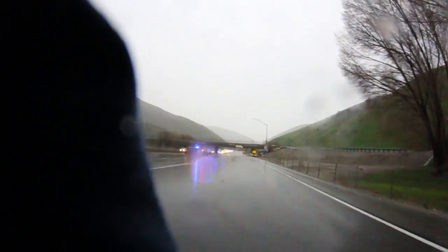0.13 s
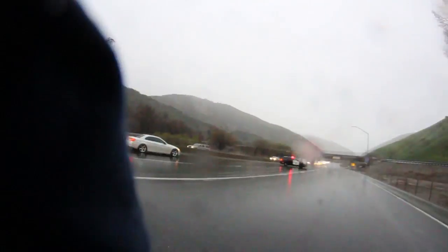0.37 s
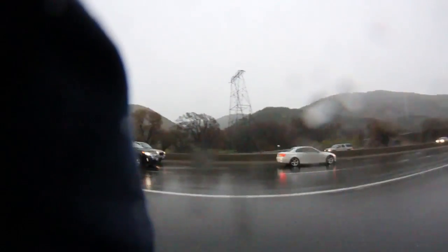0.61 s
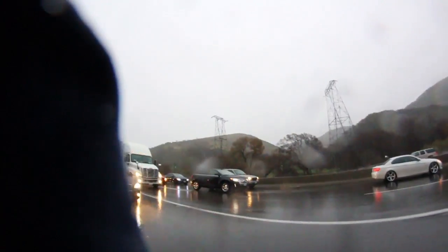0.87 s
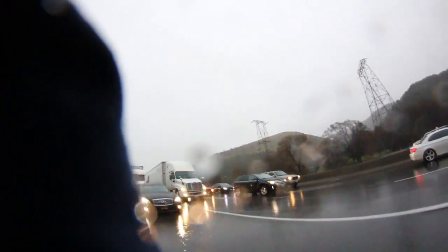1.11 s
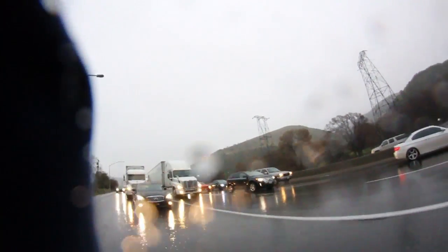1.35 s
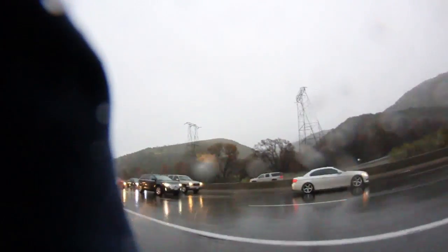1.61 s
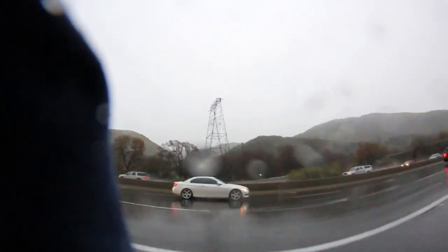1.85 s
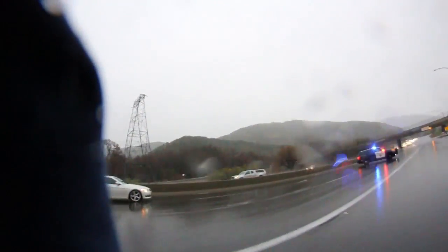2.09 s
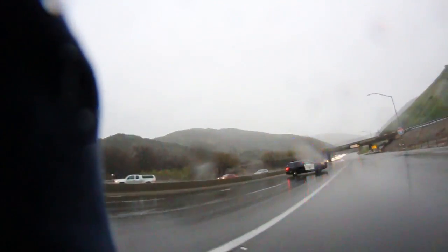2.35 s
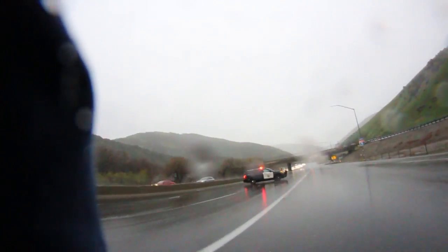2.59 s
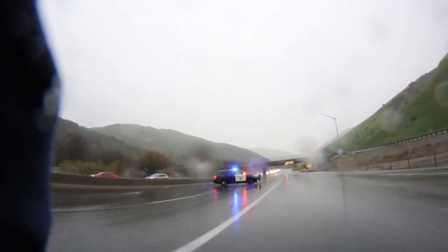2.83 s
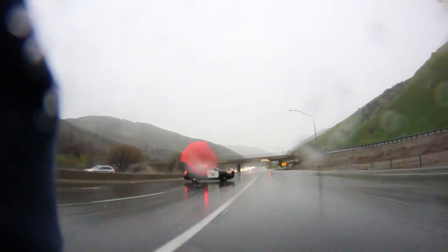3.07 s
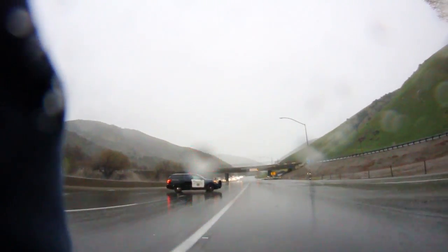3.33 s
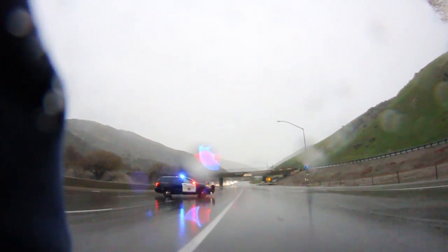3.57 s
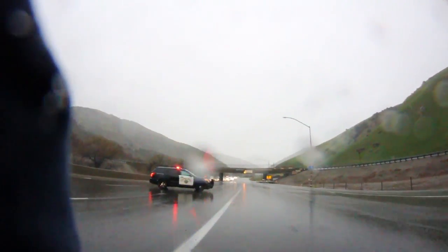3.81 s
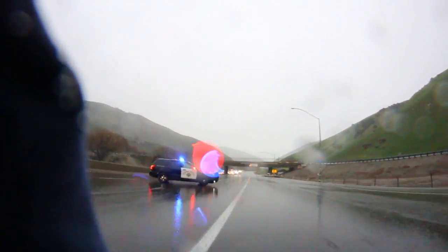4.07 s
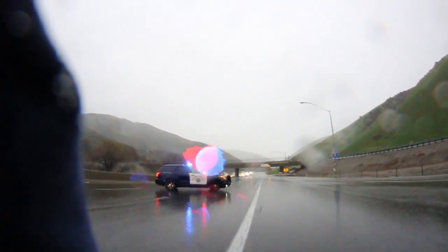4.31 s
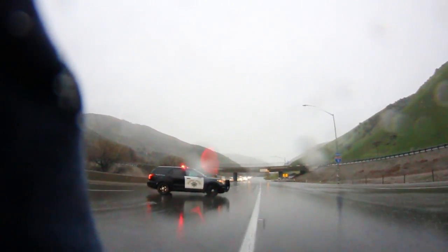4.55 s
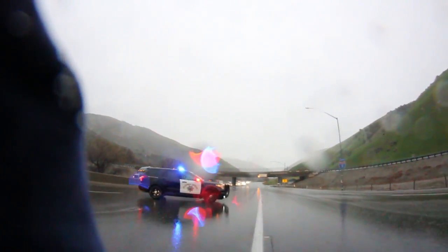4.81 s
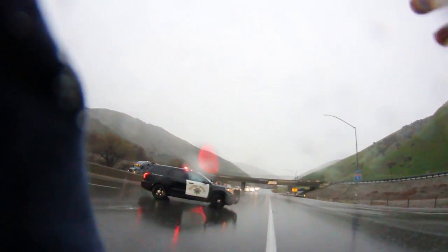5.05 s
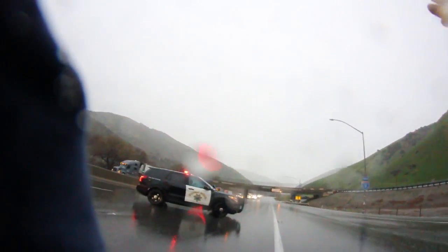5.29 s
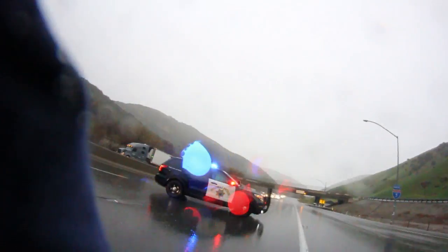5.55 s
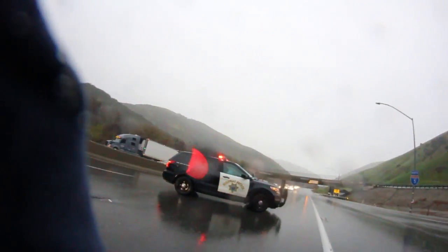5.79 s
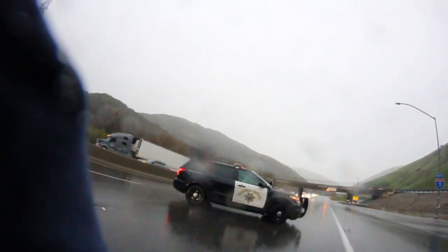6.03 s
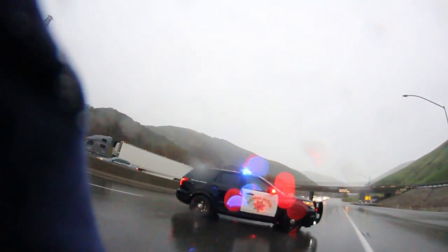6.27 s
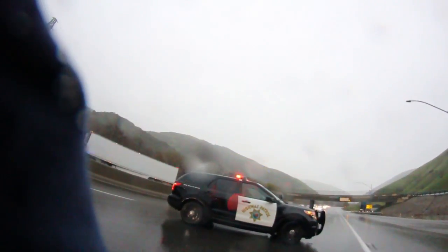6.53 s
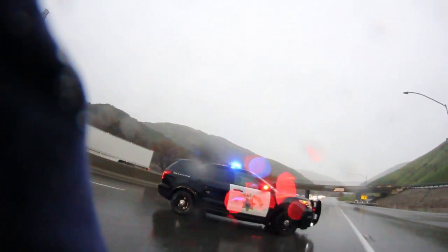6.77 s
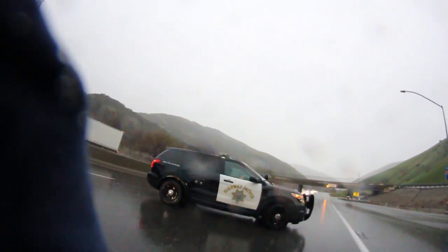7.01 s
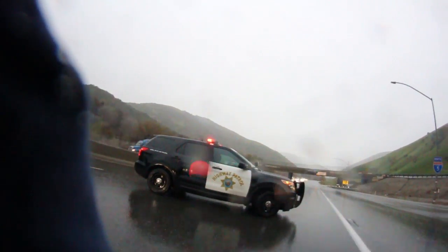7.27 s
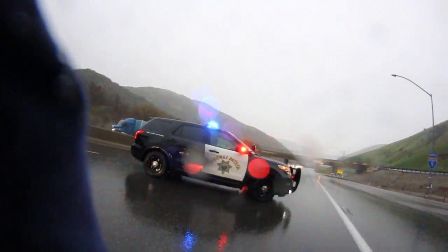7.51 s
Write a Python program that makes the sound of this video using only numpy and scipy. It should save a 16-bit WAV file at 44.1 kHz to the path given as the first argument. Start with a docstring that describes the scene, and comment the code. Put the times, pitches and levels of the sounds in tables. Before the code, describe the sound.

Constant boxy wheel rumble and irregular deck knocks dominate, so loud that the close, encased microphone distorts and crackles. Thin spray and mist hiss underneath. The roll gradually weakens and grows grainy, a puddle splash throws bright droplet ticks, and a few last bumps sound. Low traffic-like rumble and a surging rush take over with a brief sagging hum and tiny bright spits, outdoors in rain.

```python
"""Skateboard slowing on wet asphalt

Random pushes from the stones of a coarse road excite the resonances of the deck; bumps make them ring.
Band-shaped noise gives spray, mist and a low rumble; at the end a broad rush and a hum swell up.
Drops tick on the muffling case of the microphone that rides along.
The input overloads on the strongest swings; fine bright crackle joins the overload."""
import sys
import numpy as np
from scipy import signal
from scipy.fft import rfft, irfft, next_fast_len
from scipy.io import wavfile
from scipy.ndimage import uniform_filter1d, map_coordinates

SR = 44100
rng = np.random.default_rng(int(sys.argv[2]) if len(sys.argv) > 2 else 0)


def store_pcm(level_fs):
    """Save levels as 16-bit WAV."""
    pcm = np.round(np.clip(level_fs, -1, 1) * 32767).astype(np.int16)
    wavfile.write(sys.argv[1], SR, np.atleast_2d(pcm).T)


def gain_from_db(level_db):
    """Convert decibel levels to linear amplitude factors (20 dB per decade)."""
    decades = np.asarray(level_db, float) / 20
    return 10 ** decades


N = 336483

# Strength of the roll. Each row: time in seconds, low deck modes in dB, upper deck modes in dB.
ROLL_LEVEL = [(0, -13, -24), (.7, -16.5, -24), (1.3, -16, -23.5), (1.65, -15, -23.5), (1.93, -14, -24),
              (2.03, -14, -24.5), (2.3, -16, -23), (2.45, -13, -21), (3.25, -13.5, -22), (3.8, -17, -25),
              (3.92, -14, -22.5), (4.4, -14.5, -27), (4.92, -14, -26), (5.4, -18, -28), (6.0, -18, -27.5),
              (6.6, -21.5, -32.5), (7.16, -23.5, -31.5), (7.27, -31, -32.5), (7.63, -19, -33.5)]
# Stones under the wheels. Each row: time in seconds, stones per second.
STONE_RATE = [(0, 3000), (4, 2500), (5.2, 1200), (5.8, 510), (6.5, 820), (7.63, 860)]
# Deck modes while carving and while running straight, low and upper.
# Each row: centre in Hz, width in Hz, relative level in dB, signed weight (a factor).
LOW_CARVING = [(310, 69, -9.5, 0.96), (490, 116, -2.5, 0.8), (668, 119, -2, -1.034)]
LOW_STRAIGHT = [(317, 183, -7.5, 0.89), (447.6, 134, 0, -0.96), (674, 99, 0, 0.93)]
UPPER_CARVING = [(890, 326, 2, -0.65), (1237, 230, 8.5, 0.96), (1578, 650, -2, -1.25)]
UPPER_STRAIGHT = [(949, 242, 2.5, 0.77), (1077, 111, 1.5, -0.53), (1245, 380, -11.5, -1.3)]
# Carving against running straight. Each row: time in seconds, carving share of the power from 0 to 1.
CARVING_SHARE = [(0, 0.47), (.5, 0.5), (1.0, 0.95), (1.9, 0.92), (2.2, 0.49), (2.45, 0.12), (4.5, 0.18),
                 (5.3, 0.28), (7.63, 0.34)]
# Short rough stretches. Each row: centre in seconds, swell in dB, half width to 1/e of the swell in seconds.
ROUGH_PATCHES = [(.721, 3.5, .004), (1.038, 2, .004), (1.313, 2.5, .007), (1.36, 1.5, .004),
                 (1.891, 4, 0.0067), (1.947, 4, 0.0044), (2.85, 0, 0.0048), (2.936, 3, 0.0051),
                 (2.961, 2.5, 0.0045), (3.039, 4.5, 0.0081), (3.1, 3, .004), (3.118, 4.5, 0.0076),
                 (3.25, 4.5, 0.0047), (5.63, 3.5, 0.024), (5.7, 4, 0.018), (5.859, 8.5, 0.022),
                 (6.078, 6.5, 0.02), (6.261, 9.5, 0.0053), (6.32, 4.5, 0.013), (6.39, 3, 0.023),
                 (6.513, 8.5, 0.012), (6.79, 5.5, 0.061)]
# The deck mode that slides as the board leans. Each row: time in seconds, centre in Hz, level in dB.
SLIDING_MODE = [(0.3, 693, -39.5), (0.6, 710, -24), (0.85, 752, -19), (1.1, 800, -22), (1.45, 843, -20.5),
                (1.75, 803, -25), (1.9, 714, -14.5), (2.05, 700, -31), (2.4, 718, -25), (2.65, 770, -23),
                (3.2, 767, -19.5), (3.6, 708, -25.5), (4.2, 733, -29.5), (4.6, 724, -42)]
# Bumps in the road. Each row: time of the peak in seconds, peak in dB.
BUMPS = [(0.085, -9), (0.173, -1.5), (0.321, -5), (0.35, -2), (0.397, -5.5), (0.477, -6.5), (0.626, -4),
         (0.719, -1.5), (0.76, -0.5), (0.764, -1), (0.831, -7.5), (0.881, -3), (0.906, -2), (0.95, -9.5),
         (0.984, -5.5), (1.008, -2), (1.036, 1.5), (1.074, -4.5), (1.055, -6), (1.096, -3), (1.101, -6.5),
         (1.109, -5), (1.15, -3), (1.163, -5), (1.176, -7), (1.197, 0.5), (1.257, -10), (1.281, -1),
         (1.288, -4.5), (1.308, 0.5), (1.316, -5), (1.358, -2.5), (1.38, -4.5), (1.387, -7.5), (1.394, -6),
         (1.438, -7), (1.485, -5.5), (1.513, -7), (1.582, -9), (1.594, -5), (1.614, -4), (1.628, -3),
         (1.665, -3), (1.693, -4), (1.702, -6.5), (1.706, -10), (1.734, -3), (1.755, -4), (1.786, -4.5),
         (1.79, -4.5), (1.815, -8), (1.826, -1.5), (1.852, -3), (1.862, -7), (1.876, -5.5), (1.888, -9.5),
         (1.904, -3), (1.914, -7.5), (1.92, -3), (1.925, -4.5), (1.937, -8.5), (1.945, -3), (1.955, -4),
         (1.974, -3.5), (2.044, -3), (2.137, -6), (2.26, -6.5), (2.362, -7.5), (2.398, -4), (2.463, -2.5),
         (2.489, -2), (2.514, -3.5), (2.54, -6), (2.56, -2.5), (2.598, -2), (2.648, -8), (2.668, -2.5),
         (2.695, -8), (2.718, -8.5), (2.744, -4.5), (2.803, -6), (2.809, -4.5), (2.816, -7), (2.826, -8.5),
         (2.833, -6.5), (2.85, -12), (2.869, -10.5), (2.881, -5.5), (2.899, -3.5), (2.915, -3.5),
         (2.933, -8), (2.958, -6.5), (2.978, -5.5), (2.985, -3.5), (2.992, -4), (3.002, -6.5), (3.037, -9),
         (3.056, -9), (3.063, -4.5), (3.07, -5.5), (3.078, -6.5), (3.097, -6.5), (3.117, -4), (3.13, -3),
         (3.152, -6), (3.171, -4.5), (3.195, -4.5), (3.214, -2.5), (3.222, 0), (3.248, -4), (3.268, -8),
         (3.29, -7.5), (3.303, -7.5), (3.327, -5.5), (3.417, -7.5), (3.493, -2), (3.515, -4.5),
         (3.525, -6.5), (3.563, -1.5), (3.597, -4), (3.666, -5.5), (3.694, -5), (3.715, -11.5),
         (3.746, -4.5), (3.862, -3), (3.889, -6), (3.942, -3.5), (3.968, -8.5), (4.012, -11.5),
         (4.02, -6.5), (4.061, -8), (4.076, -13.5), (4.084, -6), (4.091, -7), (4.115, -3.5), (4.255, -8),
         (4.326, -2.5), (4.665, -2.5), (4.775, -5), (4.8, -18), (4.927, -8.5), (4.937, -9), (5.028, -1.5),
         (5.142, -9), (5.162, -4), (5.206, -6.5), (5.212, -11.5), (5.627, -7.5), (5.838, -21), (5.864, 1),
         (5.901, -6), (5.94, -5.5), (5.972, -17), (6.058, -4.5), (6.077, -8), (6.165, -9), (6.264, -9),
         (6.368, -15), (6.424, -10), (6.457, -22), (6.503, -21), (6.645, -8.5), (6.893, -5)]
# Colour of the scrape. Each row: frequency in Hz, relative density in dB per Hz.
SCRAPE_COLOUR = [(600, -120), (900, -41), (1150, -13), (1280, 5), (1420, -5), (1800, -43), (2600, -120)]
# Fine crackle of the overload. Each row: time in seconds, crackles per second.
CRACKLE_RATE = [(0, 15), (.7, 25), (1.0, 50), (1.9, 50), (2.1, 25), (2.45, 90), (2.9, 220), (3.25, 220),
                (3.55, 80), (3.8, 30), (4.1, 90), (4.4, 12), (5.3, 6), (6.1, 3), (6.4, 0.1), (7.63, 0.1)]
# Colour of the crackle. Each row: frequency in Hz, relative gain in dB.
CRACKLE_COLOUR = [(800, -59), (1800, -2.5), (2500, -1.5), (4000, -6.5), (7000, -14), (11000, -20.5),
                  (16000, -34)]
# Large drops on the case. Each row: start in seconds, starting level in dB, pitch in Hz.
DROPS = [(4.867, -48, 11100), (5.014, -44, 5900), (5.09, -40.5, 5650), (5.279, -53, 12500),
         (5.371, -50, 10500), (5.383, -47.5, 10000), (5.397, -45, 6060), (5.47, -45, 6530),
         (5.481, -44, 6700), (5.496, -46, 6200), (5.514, -48.5, 8500), (5.532, -42.5, 8000),
         (5.544, -42.5, 8600), (5.555, -45.5, 8100), (5.588, -45, 6500), (5.6, -44, 7600),
         (5.609, -46, 7600), (5.616, -39.5, 6200), (5.691, -49, 7200), (5.704, -43, 7000),
         (5.73, -47, 10700)]
# Fine droplets around the splash through a puddle. Each row: time in seconds, droplets per second.
DRIZZLE_RATE = [(4.6, 20), (5.3, 40), (5.47, 150), (5.53, 1200), (5.75, 800), (5.9, 300), (6.2, 20),
                (6.5, 0)]
# Water off the wheels. Each row: time in seconds, spray in dB, mist in dB.
WATER_LEVEL = [(0, -47.5, -55.5), (1.9, -49, -61), (2.3, -50, -59), (3, -49.5, -58.5), (3.4, -41, -57.5),
               (3.7, -46.5, -62), (4.2, -44, -59), (5.2, -43.5, -58.5), (5.46, -49.5, -63.5),
               (5.53, -45, -58), (5.75, -46, -55.5), (6.0, -49.5, -59), (6.4, -51.5, -59.5),
               (6.65, -43, -53), (6.85, -40, -50.5), (7.16, -46, -53.5), (7.25, -35.5, -55),
               (7.63, -37.5, -51)]
# Colours of spray and mist. Each row: frequency in Hz, relative density in dB per Hz.
SPRAY_COLOUR = [(1200, -30), (1600, -7), (1980, -13), (2150, -5), (2280, 1), (2450, -3), (2750, -10),
                (3500, -19), (4500, -30), (7000, -60)]
MIST_COLOUR = [(2500, -29.5), (4000, 0), (5500, -1.5), (6300, 1), (7500, -7), (9000, -8.5), (10500, -9),
               (13000, -20), (16000, -36.5)]
# Traffic and wind. Each row: time in seconds, rumble in dB.
RUMBLE_LEVEL = [(0, -37), (1.2, -30.5), (2.3, -36.5), (3.4, -27.5), (5.2, -30.5), (5.5, -23.5), (6.4, -28),
                (6.8, -19), (7.25, -28), (7.6, -18.5)]
# Colour of the rumble. Each row: frequency in Hz, relative density in dB per Hz.
RUMBLE_COLOUR = [(15, -68), (25, -26.5), (70, -20), (135, -6), (260, -4), (340, -9.5), (570, -120)]
# The late rush and its bright top. Each row: time in seconds, level in dB.
RUSH_LEVEL = [(4.8, -51.5), (5.5, -34), (6.4, -28.5), (6.87, -18.5), (7.15, -15), (7.25, -18.5),
              (7.5, -12.5), (7.63, -13.5)]
WASH_LEVEL = [(6.3, -69.5), (6.55, -56), (6.72, -48.5), (6.85, -44), (7.0, -46.5), (7.13, -41.5),
              (7.19, -49), (7.24, -46.5), (7.4, -44.5), (7.63, -43)]
# Colours of the rush, its bright top and the spits. Each row: frequency in Hz, relative density in dB per Hz.
RUSH_COLOUR = [(18, -41.5), (40, 1), (110, 5), (230, -6.5), (370, -17.5), (600, -3.5), (800, -12.5),
               (1100, -13), (2000, -17.5), (3200, -25), (5000, -38.5), (7500, -46.5), (9000, -58.5),
               (12000, -65.5), (16000, -68.5)]
WASH_COLOUR = [(1200, -39), (2000, -7), (3000, 0.8), (4500, 2), (6000, -2), (7600, -6.5), (8400, -18),
               (10000, -21), (13000, -24.5), (16000, -44)]
SPIT_COLOUR = [(2500, -16), (6000, 1.5), (8500, -2), (11000, 0), (12500, -6), (14500, -11.5), (16000, -18)]
# The hum, which swells and then fades as it sags. Each row: time in seconds, pitch in Hz, level in dB.
HUM = [(6.74, 602, -45), (6.79, 600, -25), (6.85, 599, -22), (6.9, 598, -18.5), (7.0, 597, -18),
       (7.17, 595, -16), (7.23, 595, -22), (7.32, 592, -24), (7.39, 582, -25), (7.45, 580, -31),
       (7.63, 578, -31)]
# Bright spits. Each row: start in seconds, starting level in dB, time to fall by 60 dB in seconds.
SPITS = [(7.4966, -37, 0.023), (7.5125, -31.5, 0.02), (7.5367, -44.5, 0.02)]
# Where the input overloads. Each row: time in seconds, ceiling of upward swings in dB.
CEILING = [(0, -5), (.4, -6), (.75, -6), (.9, -6), (1.5, -5), (2.3, -5.5), (2.8, -6.5), (3.25, -7.5),
           (3.55, -6), (4.3, -6.5), (4.55, -3.5), (5.2, -5), (5.5, 0), (5.8, 2.5), (7.63, 2)]


def unit(x):
    """Normalisation: scale to rms 1."""
    return x / np.sqrt(np.mean(x ** 2) + 1e-20)


def curves(rows):
    """Linear interpolation: one value per sample for each column after the time."""
    s, *cols = np.transpose(rows)
    return [np.interp(np.arange(N) / SR, s, c) for c in cols]


def wobble(rate):
    """Slow random modulation: a smooth curve through random knots, rate of them per second."""
    knots = rng.standard_normal(int(N * rate / SR) + 4)
    return map_coordinates(knots, [np.arange(N) * rate / SR])


def filtered(x, response):
    """Linear filtering: the spectrum of x times a complex response of frequency."""
    m = next_fast_len(N + 8192)
    return irfft(rfft(x, m) * response(np.fft.rfftfreq(m, 1 / SR)), m)[:N]


def resonances(modes, soft_hz):
    """Modal superposition: damped modes add with their signs; soft wheels and case each dull the treble."""
    def response(f):
        total = 0
        for centre, width, db, sign in modes:
            total = total + sign * gain_from_db(db) * 1j * f * width / (centre ** 2 - f ** 2 + 1j * f * width)
        return total / (1 + 1j * f / soft_hz) ** 2
    return response


def hiss(colour, patchy_db):
    """Turbulent noise: random gains over time and frequency, then a spectral colour, at rms 1."""
    z = signal.stft(rng.standard_normal(N + 512), nperseg=512)[2]
    field = uniform_filter1d(rng.standard_normal(z.shape), 6, 0)
    field = uniform_filter1d(field, 12, 1)
    noise = signal.istft(z * gain_from_db(patchy_db * unit(field)), nperseg=512)[1][:N]
    hz, db = np.transpose(colour)
    return unit(filtered(noise, lambda f: gain_from_db(np.interp(np.log(f + 1), np.log(hz + 1), db))))


def road(scatter_db, smooth):
    """Random excitation: stones push by scattered amounts, over the fine texture of the road."""
    chance = curves(STONE_RATE)[0] / SR
    hit = rng.random(N) < chance
    size = np.minimum(rng.exponential(size=N), 3.5)
    side = np.sign(rng.standard_normal(N))
    # dividing by the root of the rate keeps the power even as stones thin out
    stones = unit(hit * side * gain_from_db(scatter_db * size) / np.sqrt(chance))
    return stones + smooth * rng.standard_normal(N)


def rolling():
    """Forced vibration: the road shakes deck modes that shift with the rider's weight; rough patches swell all."""
    bump_swell_db, bump_swell_s = 0.5, 0.0036  # brief swell after each bump; its lag and 1/e half width
    t = np.arange(N) / SR
    carve = curves(CARVING_SHARE)[0]
    patches = gain_from_db(0.27 * wobble(30))
    swell_db = sum(db * np.exp(-((t - s) / width) ** 2) for s, db, width in ROUGH_PATCHES)
    bumped = np.bincount([round((s + bump_swell_s) * SR) for s, _ in BUMPS], minlength=N)
    bell = np.exp(-((t[:SR // 20] - 1 / 40) / bump_swell_s) ** 2)
    swell_db += bump_swell_db * signal.fftconvolve(bumped, bell, 'same')
    low_gain, upper_gain = gain_from_db(np.array(curves(ROLL_LEVEL)) + swell_db)
    out = np.zeros(N)
    stances = (carve, LOW_CARVING, UPPER_CARVING), (1 - carve, LOW_STRAIGHT, UPPER_STRAIGHT)
    for share, low, upper in stances:
        shake = patches * road(scatter_db=3.5, smooth=0.46)
        low_part = low_gain * unit(filtered(shake, resonances(low, soft_hz=700)))
        upper_part = upper_gain * unit(filtered(shake, resonances(upper, soft_hz=1040)))
        out += np.sqrt(share) * (low_part + upper_part)
    return out


def sliding_mode():
    """Moving resonance: slow swings of the shaking modulate a carrier of moving pitch, in two quadratures."""
    width_hz = 170  # between the half-amplitude points
    hz, db = curves(SLIDING_MODE)
    phase = 2 * np.pi * np.cumsum(hz) / SR
    shake = road(scatter_db=4.0, smooth=0.62)
    out = np.zeros(N)
    for carrier in (np.cos(phase), np.sin(phase)):
        swings = filtered(shake * carrier, lambda f: 1 / (1 + 2j * f / width_hz) ** 2)
        out += carrier * swings
    return gain_from_db(db) * unit(out)


def jolts():
    """Impulse response: a bump pushes the deck briefly and the modes of the present stance ring out."""
    push_s = 0.00026  # 1/e half width of the push
    t = np.arange(N) / SR
    push = np.exp(-((t - 3 * push_s) / push_s) ** 2)

    def ring(modes, soft_hz):
        return unit(filtered(push, resonances(modes, soft_hz))[:SR // 10])

    rings = []
    # upper modes against the low ones in dB: carving, then straight
    for low, upper, upper_db in ((LOW_CARVING, UPPER_CARVING, -10), (LOW_STRAIGHT, UPPER_STRAIGHT, -5)):
        r = ring(low, 920) + gain_from_db(upper_db) * ring(upper, 1000)
        strongest = r[np.argmax(np.abs(r))]
        rings.append(r / strongest)  # the strongest swing points up, at 1
    carve = curves(CARVING_SHARE)[0]
    out = np.zeros(N + SR)
    for s, db in BUMPS:
        shape = rings[int(carve[round(s * SR)] < .5)]
        start = round(s * SR) - np.argmax(shape)
        out[start:][:len(shape)] += gain_from_db(db) * shape
    return out[:N]


def scrape():
    """Sliding friction: a wheel drags sideways for a moment, a narrow band of noise."""
    centre_s, half_s, level_db = 5.52, .035, -31
    envelope = np.exp(-((np.arange(N) / SR - centre_s) / half_s) ** 2)
    return gain_from_db(level_db) * envelope * hiss(SCRAPE_COLOUR, patchy_db=2.5)


def crackle():
    """Random crackle: short bright ticks of scattered size, one more at each earlier bump, each repeating briefly."""
    least_db, scatter_db = -40, 2.5  # scattered ticks, before each is randomly weakened
    bump_tick_db, bump_lag_s, bump_until_s = -27, .0005, 5.9  # against the bump; later bumps do not tick
    repeat_s, repeat_loss_db = .0008, 3  # spacing and loss of the repeats, which alternate in sign
    hit = rng.random(N) < curves(CRACKLE_RATE)[0] / SR
    size = np.minimum(rng.exponential(size=N), 3)
    ticks = hit * gain_from_db(least_db + scatter_db * size)
    s, db = np.transpose(BUMPS)
    ticks[np.round((s + bump_lag_s) * SR).astype(int)] = gain_from_db(db + bump_tick_db) * (s < bump_until_s)
    repeated = np.zeros(N)
    for k in range(3):
        gain = (-1) ** k * gain_from_db(-repeat_loss_db * k)
        repeated += gain * np.roll(ticks, round(k * repeat_s * SR)) * rng.random(N)
    hz, colour_db = np.transpose(CRACKLE_COLOUR)

    def colour(f):
        gain = gain_from_db(np.interp(np.log(f + 1), np.log(hz), colour_db))
        return gain / gain.mean()

    return filtered(repeated, colour)


def drops():
    """Damped oscillation: each drop is a tiny ping of its own pitch; fine ones fall at random."""
    t60_s = .006
    fine_db, fine_scatter_db, fine_hz, fine_spread = -60, 3, 7400, .16  # spread of the log of the pitch
    falling = np.arange(N) > DRIZZLE_RATE[0][0] * SR  # none before the first row
    fine = np.flatnonzero(rng.random(N) < curves(DRIZZLE_RATE)[0] * falling / SR)
    chance = rng.standard_normal((len(fine), 2))
    s, db, hz = np.transpose(DROPS)
    start = np.r_[np.round(s * SR).astype(int), fine]
    db = np.r_[db, fine_db + fine_scatter_db * chance[:, 0]]
    hz = np.r_[hz, np.minimum(fine_hz * np.exp(fine_spread * chance[:, 1]), SR / 3)]
    k = np.arange(SR // 50)
    decay = gain_from_db(db[:, None] - 60 * k / SR / t60_s)
    pings = decay * np.sin(2 * np.pi * hz[:, None] * k / SR)
    return np.bincount((start[:, None] + k).ravel(), pings.ravel(), minlength=N)[:N]


def water():
    """Broadband noise of many droplets: coarse spray off the wheels and a finer mist above it."""
    spray_db, mist_db = curves(WATER_LEVEL)
    spray = gain_from_db(spray_db) * hiss(SPRAY_COLOUR, patchy_db=1.1)
    return spray + gain_from_db(mist_db) * hiss(MIST_COLOUR, patchy_db=1.2)


def late_rush():
    """Modulated noise and tone: a broad rush swells in, with a hum and a few bright decaying spits."""
    t = np.arange(N) / SR
    rush = gain_from_db(curves(RUSH_LEVEL)[0] + 0.56 * wobble(8.5)) * hiss(RUSH_COLOUR, patchy_db=0.9)
    wash = gain_from_db(curves(WASH_LEVEL)[0]) * hiss(WASH_COLOUR, patchy_db=.5)
    hz, db = curves(HUM)
    hz = hz + 2.2 * wobble(25)
    hum = np.sqrt(2) * gain_from_db(db + 1.1 * wobble(30)) * np.sin(2 * np.pi * np.cumsum(hz) / SR)
    gate = sum((t > s) * gain_from_db(db - 60 * np.abs(t - s) / t60) for s, db, t60 in SPITS)
    return rush + wash + hum + gate * hiss(SPIT_COLOUR, patchy_db=1.5)


def rumble():
    """Low-frequency noise: traffic and wind, drifting in level."""
    level_db = curves(RUMBLE_LEVEL)[0] + 1.6 * wobble(5.2)
    return gain_from_db(level_db) * hiss(RUMBLE_COLOUR, patchy_db=-0.9)


def scene():
    """Linear superposition: every source adds at the one microphone."""
    board = rolling() + sliding_mode() + jolts() + scrape()
    ticking = crackle() + drops()
    return (board + ticking + water() + late_rush() + rumble())[None]


def bend(x, limit, knee):
    """Saturation: swings approach the limit, more abruptly for a higher knee."""
    return x / (1 + np.abs(x / limit) ** knee) ** (1 / knee)


def low_pass(x):
    """Removes everything above the highest recorded frequency."""
    return signal.sosfilt(signal.butter(12, 15830, fs=SR, output="sos"), x)


def record(dry):
    """Overload: swings flatten at the ceiling, and a bass cut after it tilts the flat tops."""
    lower_db = 0.3  # downward swings have this much more room
    soft_above_db = 3  # the microphone gives way gently towards this far above the ceiling
    top = gain_from_db(curves(CEILING)[0] + lower_db * (dry[0] < 0))
    soft = bend(dry[0], top * gain_from_db(soft_above_db), knee=6)
    flattened = bend(soft, top, knee=60)
    mix = filtered(flattened, lambda f: 1j * f / (230 + 1j * f))
    return low_pass(mix[None])


dry = scene()
out = record(dry)
store_pcm(out)
```